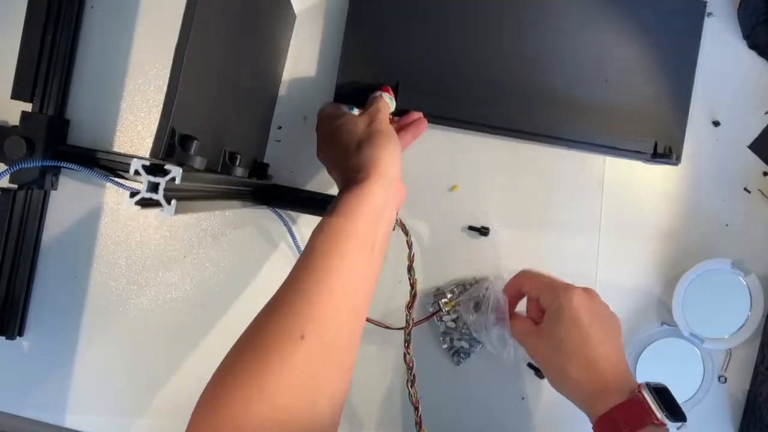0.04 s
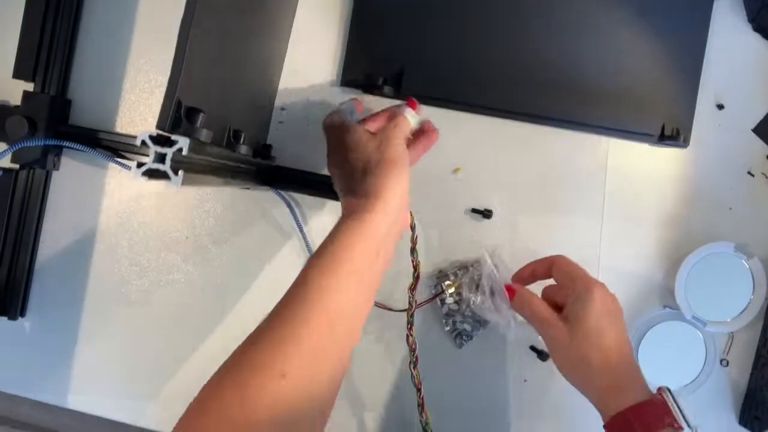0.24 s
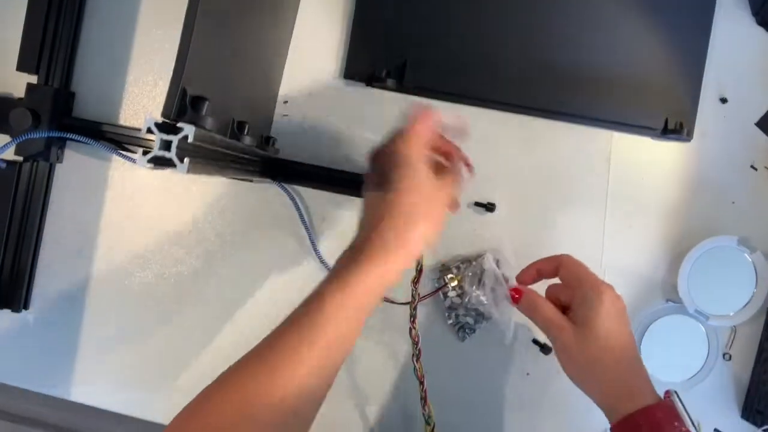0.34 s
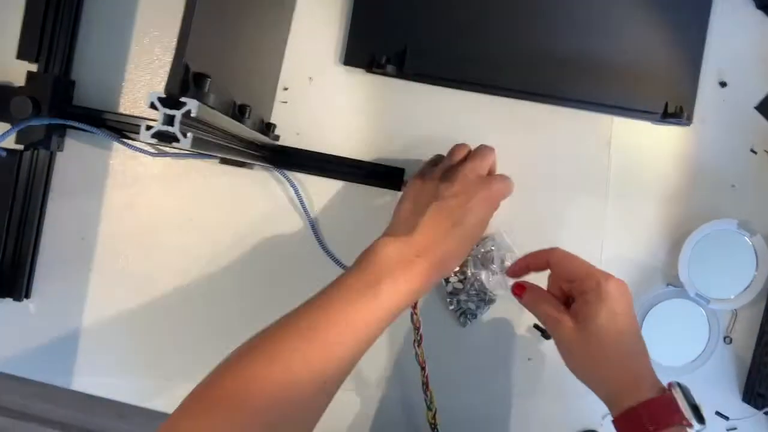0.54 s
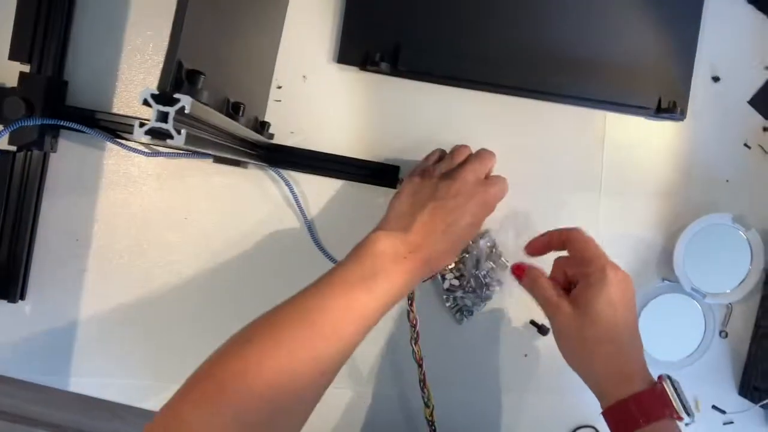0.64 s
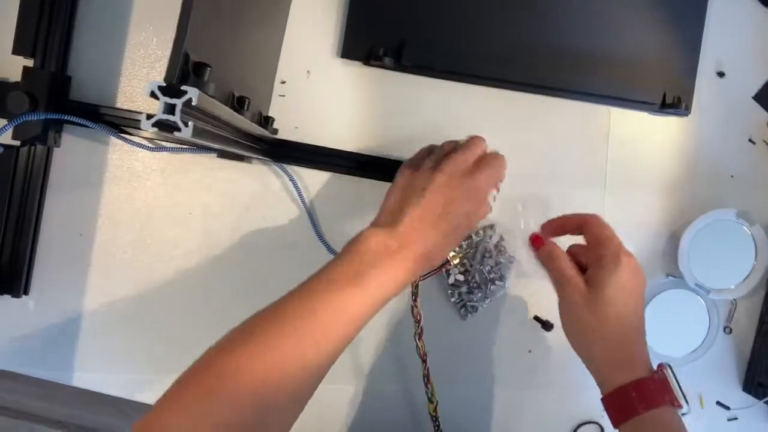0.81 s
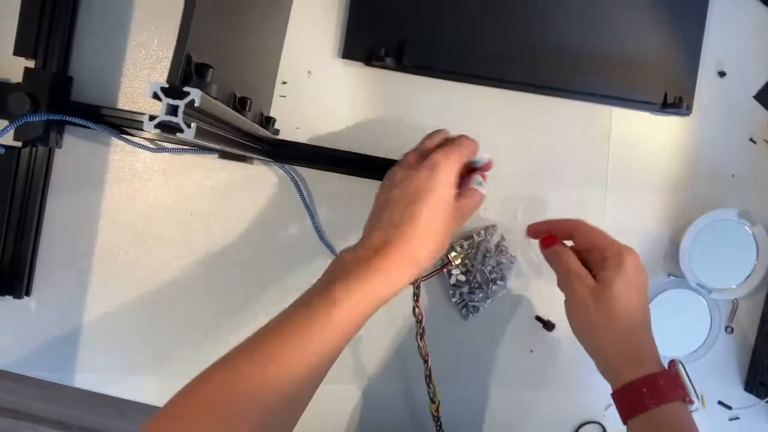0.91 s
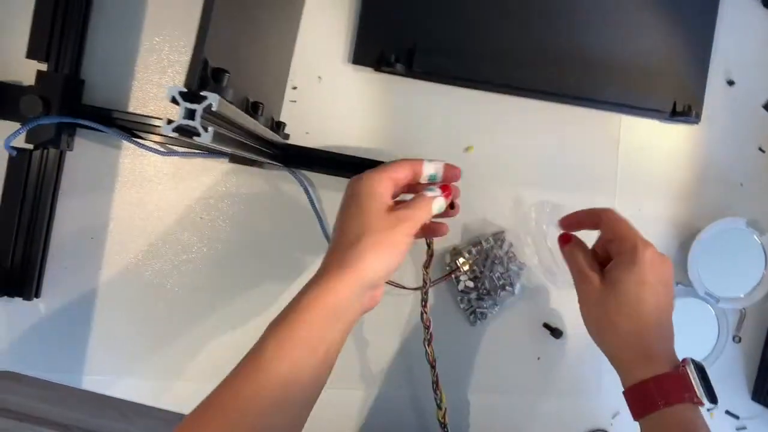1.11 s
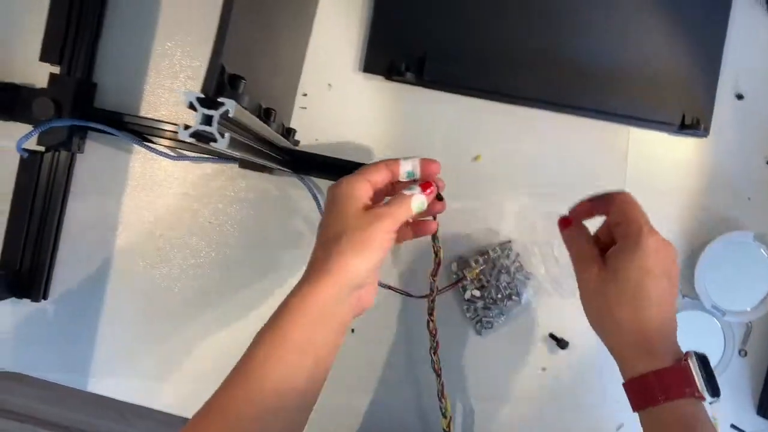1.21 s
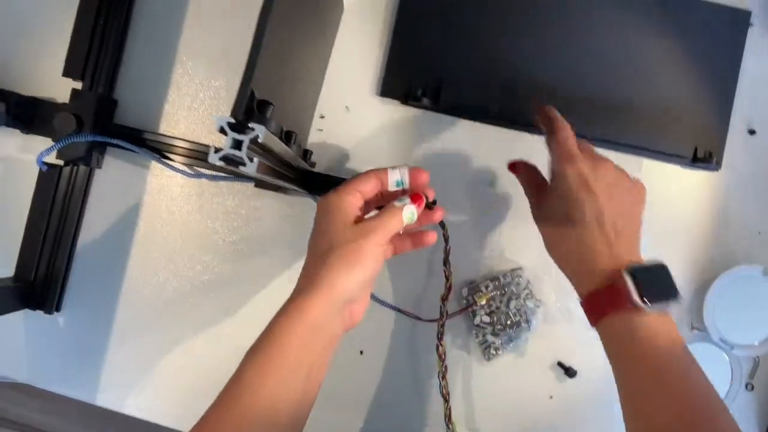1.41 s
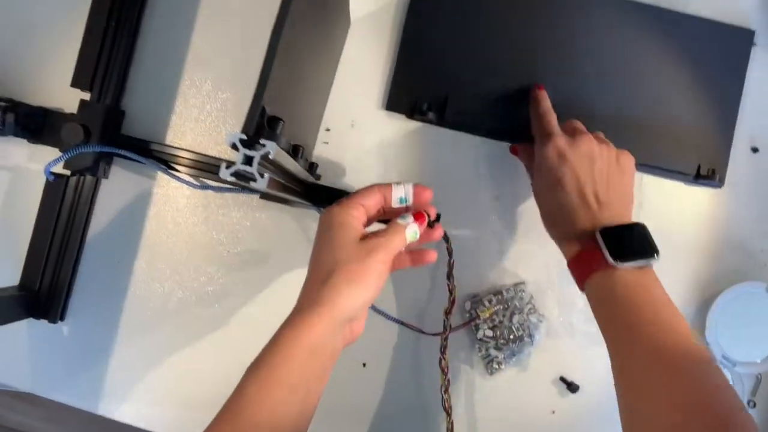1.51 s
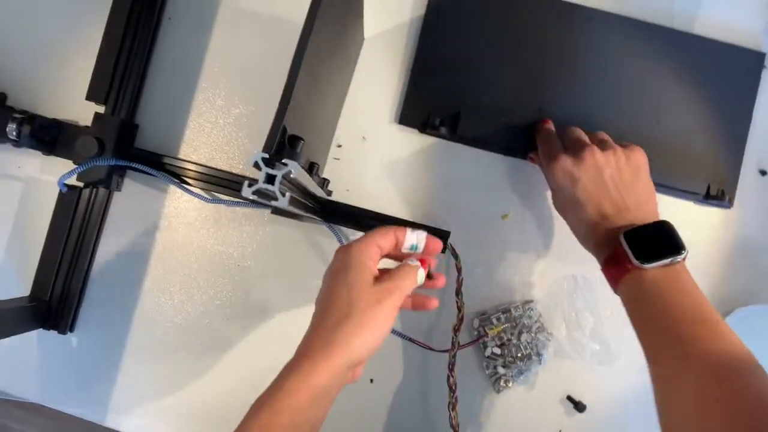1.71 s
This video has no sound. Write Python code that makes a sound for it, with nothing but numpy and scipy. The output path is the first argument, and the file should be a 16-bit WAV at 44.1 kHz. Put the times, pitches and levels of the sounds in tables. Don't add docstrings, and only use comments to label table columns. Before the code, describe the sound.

Small nuts and screws rattle in a rustling plastic bag on a workbench; a hard hollow knock comes early, then scattered soft clicks, a quiet gap and a final small rattle, close up in a quiet room.

```python
import sys
import numpy as np
from scipy import signal
from scipy.fft import rfft, irfft
from scipy.io import wavfile
from scipy.ndimage import uniform_filter1d

SR = 44100
rng = np.random.default_rng(int(sys.argv[2]) if len(sys.argv) > 2 else 0)


def transcribe(signal):
    frames = np.atleast_2d(signal).T
    limited = np.clip(frames, -1, 1)
    pcm = np.round(limited * 32767).astype(np.int16)
    wavfile.write(sys.argv[1], SR, pcm)


def to_linear_factor(level_db):
    exponent = np.asarray(level_db, float) / 20
    return 10 ** exponent


N = 77175
LEAD = 2048

# [t/s, level/dB, brightness/dB per octave, free ring before a hand mutes it/s]
KNOCKS = [(-.006, -39.5, -4, 0.15), (0.1573, -37, 3.5, 0.25), (0.2132, -18.5, 1, 0.22),
          (0.236, -32.5, -0.5, .2), (0.643, -54.5, 1.5, 0.16), (1.575, -53.5, -2, .2),
          (1.593, -40.5, 3, 0.12), (1.623, -47, 2, 0.16), (0.418, -50, 4.5, 0.43),
          (0.936, -53.5, 2.5, 0.022), (1.74, -61.5, 3.5, .1)]
# [f/Hz, level/dB, t60/s]
BENCH_MODES = [(128, -13.5, 0.91), (175.4, -8, 0.27), (211.9, 0.5, 0.24), (252, 2, 0.045),
               (318.1, -1.5, 0.15), (422.8, -12.5, .14), (531.5, -7.5, 0.05), (619.5, -13.5, 0.24),
               (682, -16, 0.17), (759, -13.5, 0.037), (914, -21, 0.14), (1142, -12, 0.056),
               (1138.6, -23.5, 0.22), (1629, -22.5, 0.095)]
# [t/s, peak level/dB, f/Hz]
CLACKS = [(.161, -36, 2800), (0.2138, -15, 1120), (.2146, -32.5, 1800), (.228, -31.5, 1650),
          (0.2777, -29.5, 1500), (0.4115, -41.5, 1190), (0.4584, -33.5, 1266), (0.549, -39.5, 1290),
          (0.6855, -43, 1410), (0.7137, -42.5, 1320), (.738, -46, 1180), (0.7473, -39.5, 1520),
          (0.7544, -38.5, 1194), (0.7707, -41.5, 1540), (0.8248, -35, 1190), (.835, -52, 1310),
          (0.8615, -38, 1570), (0.878, -43, 1390), (.928, -44, 1484), (0.9358, -30.5, 1283),
          (0.9788, -38.5, 1250), (0.9995, -39, 1350), (1.0094, -41, 1144), (1.1087, -44, 1210),
          (1.1212, -40, 1442), (1.5765, -43, 1736), (1.581, -40, 1750), (1.587, -53.5, 1750),
          (1.599, -37, 1500), (1.604, -40, 1680), (1.609, -35, 1370), (1.651, -43, 1680),
          (1.676, -48, 1900), (1.691, -49.5, 1700), (1.748, -46, 1470), (1.5935, -28.5, 1730),
          (1.6225, -35.5, 1700), (1.6317, -40, 1880), (1.6459, -38, 1820), (1.7414, -41.5, 1480)]
# [t/s, peak level/dB, f/Hz]
PINGS = [(0.459, -46, 4230), (.669, -40.5, 6180), (0.77, -46.5, 5270), (0.934, -58, 3360),
         (1.008, -42, 6330), (1.605, -51, 3560), (1.643, -48, 3400), (1.6841, -38.5, 4140)]
# [start t/s, length/s, level/dB]
HEAPS = [
    (.002, 0.06, -27.5),
    (1.584, 0.15, -40.5),
]
HEAP_HZ = (1045, 1910)
# [t/s, peak level/dB, length/s, brightness/dB per octave]
TICKS = [(.004, -34, 0.018, -3), (0.1486, -33.5, 0.0034, 5.5), (0.1572, -50, 0.016, -17.5),
         (0.213, -33.5, 0.0063, 2), (0.2229, -31.5, 0.022, -6), (0.2758, -21, 0.0036, 0),
         (0.411, -46.5, 0.011, -0.5), (0.4555, -37.5, 0.015, -7.5), (0.542, -55.5, 0.0094, -11.5),
         (0.662, -62, 0.017, 6), (0.6845, -48.5, 0.0076, -10.5), (0.761, -67, 0.011, -17),
         (0.814, -52, 0.0039, -6), (0.821, -40.5, 0.0076, -4), (0.83, -47.5, 0.013, -5.5),
         (0.8577, -39.5, 0.012, -2.2), (0.933, -27, 0.0034, 4), (0.998, -49.5, 0.028, -5),
         (1.099, -45.5, 0.029, 0), (1.108, -45, 0.014, -4.5), (1.112, -50.5, 0.011, 1),
         (1.575, -45.5, 0.0086, 11), (1.582, -38, 0.0039, 9), (1.5922, -31.5, 0.013, 7),
         (1.6, -36.5, 0.012, -1), (1.623, -36, 0.0033, 8), (1.629, -47, 0.073, -2),
         (1.652, -47.5, 0.056, 0.5), (1.683, -32, 0.0034, 1), (1.724, -38, 0.00067, 3),
         (1.741, -41, 0.0086, -2)]
# [f/Hz, level/dB]
TICK_TONE = [(800, -54.5), (1500, -12.5), (3700, -8.5), (7000, -5.5), (10500, -5.5), (13500, -2.5),
             (15300, -10.5), (16800, -15)]
# [t/s, level/dB, brightness/steps of +2.4 dB above 1500 Hz and -1.2 dB
HANDLING = [(0, -48.5, 4), (.13, -60, 2.5), (.3, -52, 0), (.43, -62.5, 2.5), (.58, -65, 0.5),
            (.7, -64.5, 1), (.79, -66.5, 1), (.84, -64, 3), (1.02, -65.5, 1.5), (1.08, -69.5, -4),
            (1.105, -66, 0.5), (1.18, -66.5, 4), (1.21, -80, -8.5), (1.4, -79.5, -0.5), (1.555, -88.5, 3),
            (1.58, -66.5, 6.5), (1.665, -63, 2.5), (1.72, -78, 5)]
# [f/Hz, level/dB]
FILM_TONE = [(150, 4), (450, 7), (1200, -6), (2500, -12), (5000, -17), (10000, -24.5), (13500, -22),
             (16500, -35.5)]
# [f/Hz, level/dB, t60/s]
FRAME_MODES = [(172, 1, 0.12), (224, -3, 0.5), (307, -3.5, 0.2), (430.5, -4, 0.23), (663, 1, 0.14),
               (910, -6.5, 0.34), (1016, 1, .14), (1166, 0.5, 0.22), (1188, 1.5, 0.089), (1288.3, -0.5, .2),
               (1480, -14.5, .1), (1900, -22, .15), (2200, -10.5, 0.14), (2744, -8, 0.23)]
# [t/s, level/dB]
LEANING = [(0, -68), (.08, -81), (.19, -61), (.24, -41), (.58, -79), (.662, -58.5), (.78, -86), (1.18, -81),
           (1.3, -58), (1.4, -69.5), (1.54, -70), (1.6, -55.5), (1.75, -61.5)]
# [f/Hz, level/dB]
LEAN_TONE = [(20, -9), (35, -8), (70, -2), (120, -17), (300, -20.5), (700, -60)]
# [f/Hz, level/dB]
AIR_TONE = [(25, -11.5), (60, -9.5), (114, -20.5), (250, -1.5), (600, -16), (1000, -32), (5000, -33.5),
            (12500, -32)]
# [f/Hz, t60/s]
ROOM_DECAY = [(100, 0.34), (500, 0.28), (2000, 0.27), (8000, 0.22), (16000, 0.09)]
# [f/Hz, likeness 0-1]
PORT_LIKENESS = [(60, 1), (300, 0.73), (700, 0.65), (1200, 0.73), (2200, 0.066), (5500, 0.35), (7500, 0.83),
                 (14500, .9), (16500, .5)]
# [f/Hz, left over right level/dB]
LEFT_OVER_RIGHT = [(100, -2), (400, 0), (2000, 2.5), (4000, 0.5), (8000, 0.5)]
# [f/Hz, level/dB]
MIC_RESPONSE = [(12700, 0), (13300, -9), (14400, -9), (14800, 2), (15900, 0), (16300, -20)]
# [from f/Hz, to f/Hz, share of time in mid, share of time in side, masking by the treble 0-1]
FAINT_BANDS = [(5200, 6200, .03, 0, 1), (6200, 7000, .1, 0, 1), (7000, 7700, .24, 0, 1),
               (7700, 8200, .08, 0, 1), (9400, 10600, 0, .23, 1), (12300, 13150, .1, 0, 0),
               (13150, 14500, .91, .1, 0), (14500, 15900, .45, .35, .3), (15900, 17500, .9, .88, 0)]

TWIN_DB = -10


def silence():
    return np.zeros((2, N + LEAD))


def hiss(size=N + LEAD):
    return rng.standard_normal((2, size))


def evened(x):
    return x / np.sqrt(np.mean(x ** 2) + 1e-20)


def read(points, hz):
    f, value = np.transpose(points)
    return np.interp(np.log(hz + 1), np.log(f + 1), value)


def follow(curve, column):
    rows = np.transpose(curve)
    return np.interp((np.arange(N + LEAD) - LEAD) / SR, rows[0], rows[column])


def add(mix, s, sound):
    part = mix[:, round(s * SR) + LEAD:][:, :sound.shape[1]]
    part += sound[:, :part.shape[1]]


def colour(x, tone, tilt_db=0):
    hz = np.fft.rfftfreq(x.shape[1], 1 / SR)
    tilt = to_linear_factor(tilt_db * np.log2(np.minimum(hz + 300, 11000) / 8000))
    gain = evened(to_linear_factor(read(tone, hz))) * tilt
    return irfft(rfft(x) * gain, x.shape[1])


def ring(t, hz, t60, turn):
    cycles = hz * t + np.array([[0], [turn]])
    return to_linear_factor(-60 * t / t60) * np.sin(2 * np.pi * cycles)


def bench():
    out, t = silence(), np.arange(SR) / SR
    rise_s, detune = .002, .01
    mute_db, mute_slope = -36.5, 0.28
    wobble_db, wobble_hz = 5, (11, 30)
    for s, db, tilt_db, free_s in KNOCKS:
        for k, (hz, mode_db, t60) in enumerate(BENCH_MODES):
            u, turn = rng.random(2)
            swell = 1 - np.exp(-t / (rise_s * (.2 + (230 / hz) ** 3)))
            beating_db = wobble_db * np.sin(2 * np.pi * t * np.interp(u, (0, 1), wobble_hz))
            muting_db = mute_db * (t / max(free_s, .02) * (hz / 150) ** mute_slope) ** 4
            strength = to_linear_factor(db + mode_db + tilt_db * np.log2(hz / 250))
            level = (-1) ** k * to_linear_factor([[0], [TWIN_DB]]) * strength
            tone = ring(t, hz * (1 + detune * (u - .5)), t60, turn)
            add(out, s, level * swell * to_linear_factor(muting_db + beating_db) * tone)
    return out


def heaps():
    hits = []
    low, high = HEAP_HZ
    for s, length, db in HEAPS:
        for u, v, w in rng.random((22, 3)):
            hits.append((s + length * u ** 2, db - 12 * u - 10 * v, low + (high - low) * w))
    return hits


def clacks():
    out, t = silence(), np.arange(2000) / SR
    clack_t60, fizz_db = .015, -8
    overtone, overtone_db, overtone_ring = 1.27, -14, 1.2
    for s, db, hz in [*CLACKS, *PINGS, *heaps()]:
        turn = rng.random(2)
        t60 = clack_t60 * (.6 if db > -27 else np.sqrt(1300 / hz))
        band = signal.butter(2, [hz * 0.73, hz * 1.99], "band", fs=SR)
        puff = evened(signal.lfilter(*band, hiss(len(t)))) * to_linear_factor(fizz_db - 60 * t / t60)
        tone = ring(t, hz, t60, turn[0])
        tone += to_linear_factor(overtone_db) * ring(t, hz * overtone, t60 * overtone_ring, turn[1])
        attack = np.minimum(t / 0.00075, 1)
        add(out, s, to_linear_factor(db) * attack * (tone + puff))
    return out


def ticks():
    out, t = silence(), np.arange(4000) / SR
    for s, db, length, tilt_db in TICKS:
        burst = colour(hiss(len(t)), TICK_TONE, tilt_db)
        u = t / max(length, .001)
        swell = np.minimum(u / .22, 1) ** 2
        add(out, s, burst * swell * to_linear_factor(db + 0.5 - 22.7 * u))
    return out


def film():
    size = N + LEAD
    film_db, creases_per_s, spread_db, hiss_share = 6, 600, 7.5, .8
    crease = to_linear_factor(spread_db * np.minimum(rng.exponential(1, size), 3))
    crease = crease * (rng.random(size) < creases_per_s / SR)
    grain = signal.lfilter([1], [1, -.97], crease ** 2)
    level = np.sqrt(hiss_share + (1 - hiss_share) * grain / grain.mean())
    rustle = colour(level * hiss(), FILM_TONE)
    dull = signal.lfilter(*signal.butter(1, 1500, fs=SR), rustle)
    crisp = to_linear_factor(2.4 * follow(HANDLING, column=2))
    moved = dull / np.sqrt(crisp) + (rustle - dull) * crisp
    return moved * to_linear_factor(film_db + follow(HANDLING, column=1))


def frame():
    out, t = silence(), np.arange(SR // 2) / SR
    set_down_s, frame_db = -0.0071, -38
    for hz, db, t60 in FRAME_MODES:
        tone = ring(t, hz, t60, rng.random())
        add(out, set_down_s, to_linear_factor([[0], [TWIN_DB]]) * to_linear_factor(frame_db + db) * tone)
    return out


def leaning():
    return colour(hiss(), LEAN_TONE) * to_linear_factor(follow(LEANING, column=1))


def air():
    air_db, lump_db = -74.5, 1.5
    lumps = rng.standard_normal(N + LEAD)
    for _ in range(2):
        lumps = uniform_filter1d(lumps, 3000)
    return colour(hiss(), AIR_TONE) * to_linear_factor(air_db + lump_db * evened(lumps))


def room(x):
    hz, t, z = signal.stft(hiss(SR // 2), SR, nperseg=256)
    decay = to_linear_factor(-60 * t / read(ROOM_DECAY, hz)[:, None]) * (t > .005)
    tail = signal.istft(z * decay, SR, nperseg=256)[1]
    tail = tail / np.linalg.norm(tail[0])
    return signal.fftconvolve(x[:1], tail, axes=1)[:, :x.shape[1]]


def ports(x):
    lead_s, crossover_hz = 1.45e-4, 4500
    hz, (a, b) = np.fft.rfftfreq(x.shape[1], 1 / SR), rfft(x)
    same = np.clip(read(PORT_LIKENESS, hz), 0, 1)
    tilt = to_linear_factor(read(LEFT_OVER_RIGHT, hz) / 2)
    turn = np.where(hz > crossover_hz, -np.exp(2j * np.pi * hz * lead_s), 1)
    right = same * turn * a + np.sqrt(1 - same ** 2) * b
    return irfft(np.array([a * tilt, right / tilt]), x.shape[1])


def scene():
    room_db, clack_room_db = -10, -7
    nuts = clacks()
    rest = bench() + ticks() + film() + frame()
    reverb = to_linear_factor(room_db) * room(rest + to_linear_factor(clack_room_db) * nuts)
    mix = nuts + rest + reverb + leaning() + air()
    pad = np.zeros((2, SR // 10))
    return ports(np.hstack([mix, pad]))[:, LEAD:LEAD + N]


def band_db(z, band):
    return 10 * np.log10((abs(z[:, band]) ** 2).mean(1) + 1e-20)


def faint_bands_silenced(x):
    mid_side = np.array([x[0] + x[1], x[0] - x[1]]) / 2
    hz, t, z = signal.stft(mid_side, SR, nperseg=1024)
    keep = np.ones(z.shape)
    treble = band_db(z, (hz >= 2000) & (hz < 12000))
    for lo, hi, mid, side, masking in FAINT_BANDS:
        band = (hz >= lo) & (hz < hi)
        waver_db = 7 * uniform_filter1d(rng.standard_normal(treble.shape), size=5)
        margin = band_db(z, band) - masking * treble + waver_db
        bar = [[np.quantile(margin[0], mid)], [np.quantile(margin[1], side)]]
        keep[:, band] = (margin >= bar)[:, None]
    m, s = signal.istft(z * keep, SR, nperseg=1024)[1][:, :N]
    return np.array([m + s, m - s])


def top_cut(x):
    return signal.sosfilt(signal.butter(12, 17050, fs=SR, output="sos"), x)


def record(dry):
    gain = to_linear_factor(read(MIC_RESPONSE, np.fft.rfftfreq(N, 1 / SR)))
    heard = irfft(rfft(dry) * gain, N)
    limit = signal.firwin(255, 16700, fs=SR)
    cut = signal.oaconvolve(heard, limit[None], "same")
    return top_cut(faint_bands_silenced(cut))


dry = scene()
out = record(dry)
transcribe(out)
```